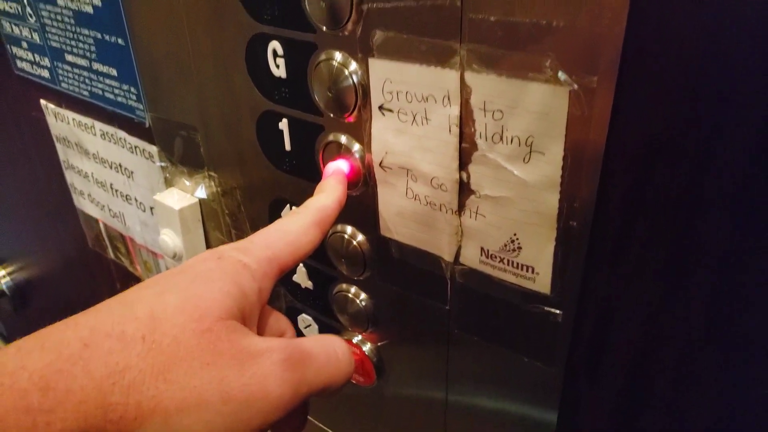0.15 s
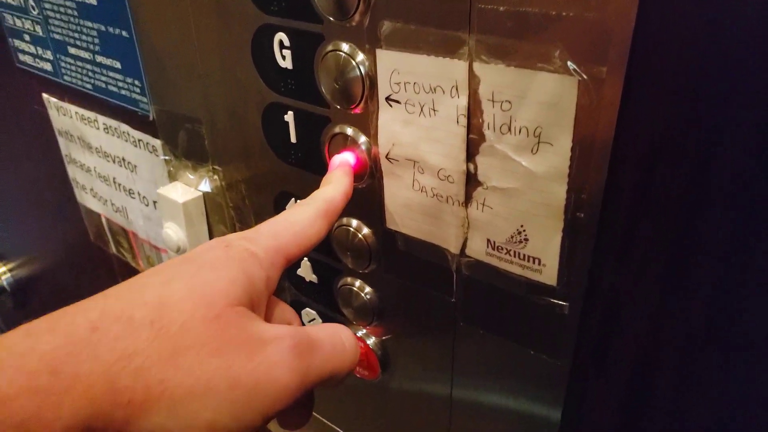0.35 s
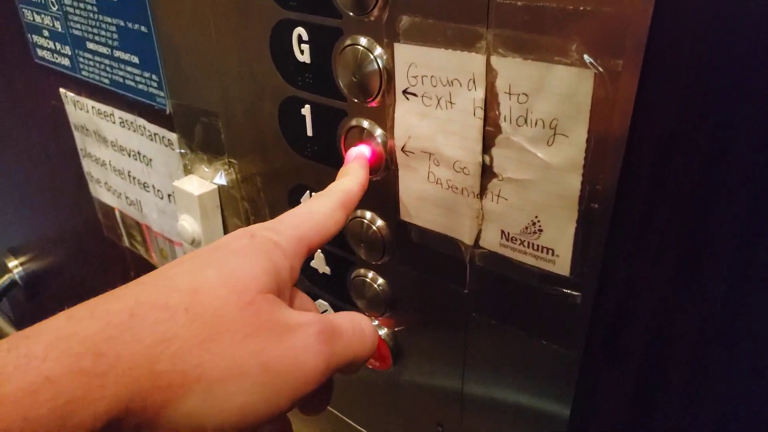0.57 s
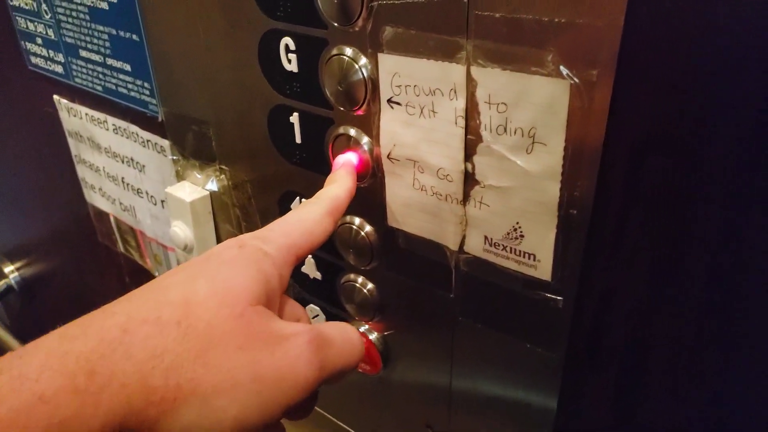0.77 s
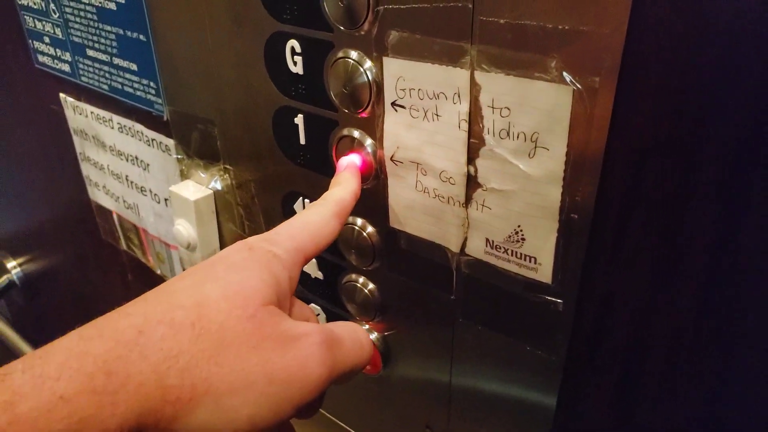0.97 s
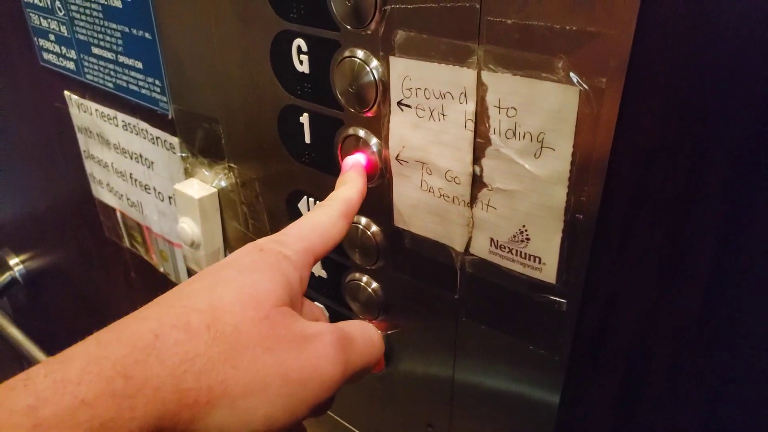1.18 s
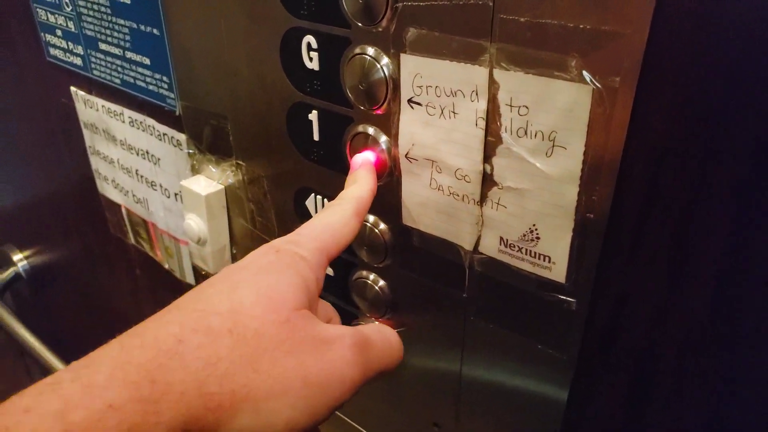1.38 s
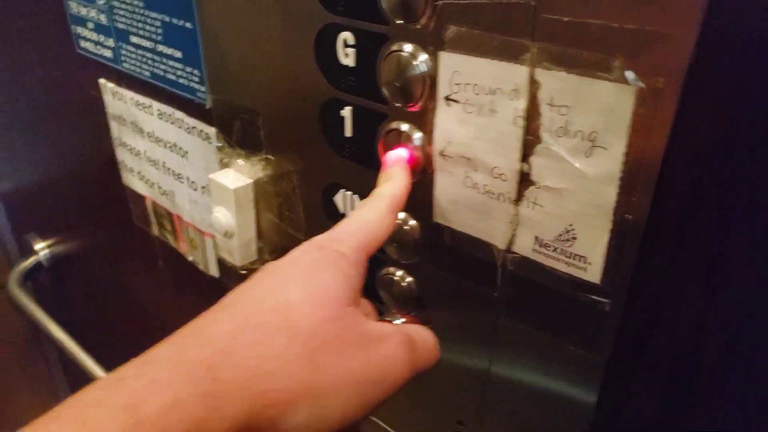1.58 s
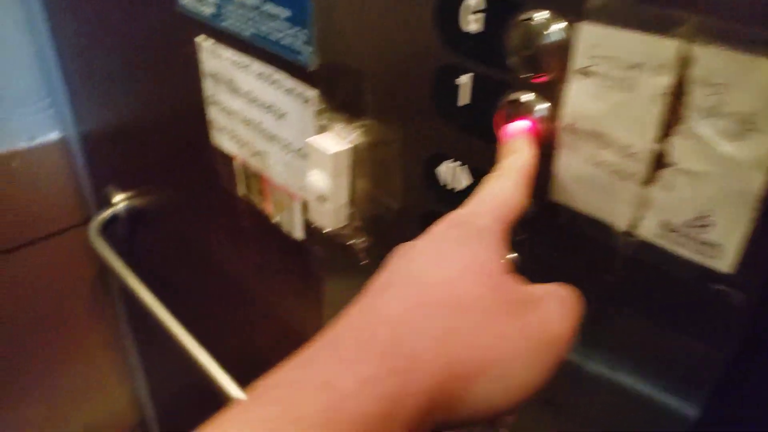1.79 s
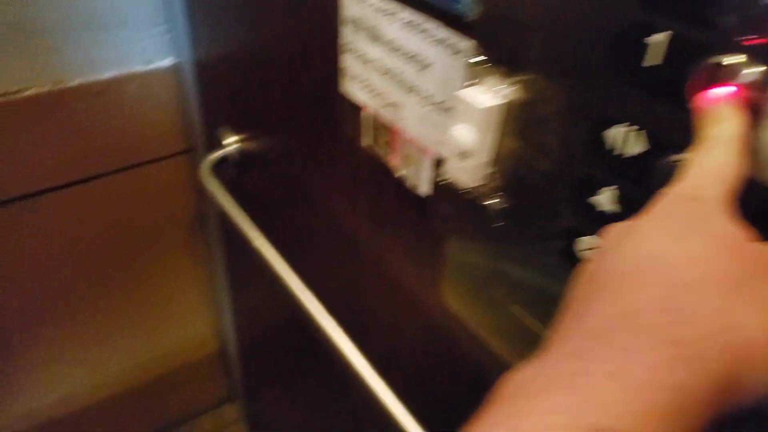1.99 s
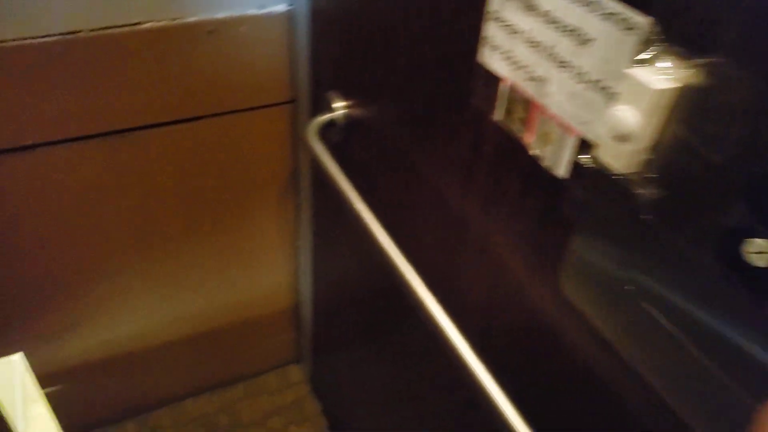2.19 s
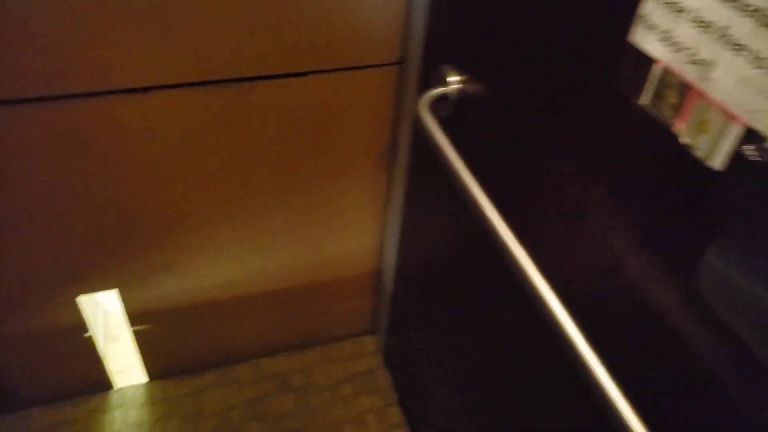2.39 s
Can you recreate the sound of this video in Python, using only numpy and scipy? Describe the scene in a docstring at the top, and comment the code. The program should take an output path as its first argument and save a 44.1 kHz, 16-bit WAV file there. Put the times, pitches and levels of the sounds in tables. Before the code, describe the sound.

An elevator mechanism clunks loudly inside a small cab. Low, surging rumble begins quietly, with motor hum and thin hiss rising and light latch ticks near 0.3 s. The rattling metallic clunk hits at 0.75 s with a deep boom, then a steel knock rings and bounces at 1.0-1.1 s. Shaft echoes fade under steady hum; ticks at 1.25 and 2.3 s, a faint ping at 2.36 s.

```python
"""A lift's mechanism clunks in its shaft, heard inside the small cab as it sets off; then a steel part
knocks and rings. Both are coloured noise with a dense echo tail, plus clusters of decaying metal modes.
Two jolts make the cab boom in damped sines. Latch ticks are resonant noise, and a faint ping ends them.
Underneath lie wavering sine tones (motor hum, drone, a brief singing tone) and shaped noise: the rumble
of the ride, soft rushing, the drive's hiss and whine, and faint microphone noise."""
import sys
import numpy as np
from scipy import signal
from scipy.fft import rfft, irfft
from scipy.io import wavfile
from scipy.ndimage import uniform_filter1d

SR = 44100
rng = np.random.default_rng(int(sys.argv[2]) if len(sys.argv) > 2 else 0)


def materialize(psi):
    """Save the field psi as 16-bit PCM at rate SR to the path in sys.argv[1].

    A 1-D psi becomes a single channel; in a 2-D psi each row is a channel.
    """
    bounded = np.clip(np.atleast_2d(psi).T, -1, 1)
    quanta = np.round(bounded * 32767).astype(np.int16)
    wavfile.write(sys.argv[1], SR, quanta)


N = 108045
T = np.arange(N) / SR
FREQS = np.maximum(np.fft.rfftfreq(N, 1 / SR), 1)  # Hz, kept above zero for the logarithms


def undb(db):
    """Decibels to gain."""
    return 10 ** (np.asarray(db) / 20)


def by_hz(table, hz=FREQS):
    """Read a table on a log-frequency axis."""
    table_hz, values = np.array(table).T
    return np.interp(np.log(hz), np.log(table_hz), values)


def by_time(table):
    """Gain from a level curve."""
    return undb(np.interp(T, *np.array(table).T))


def decay(t, t60):
    """Exponential decay that falls 60 dB in t60 seconds."""
    return np.exp(-np.log(1000) * t / t60)


def build_up(t, build_s):
    """Exponential rise towards full level with this time constant."""
    return 1 - np.exp(-t / build_s)


def walk(rate):
    """Slow random drift around 0 with a spread near 1: stepped noise, smoothed twice."""
    step = int(SR / rate)
    steps = np.repeat(rng.standard_normal(N // step + 1), step)
    smooth = uniform_filter1d(uniform_filter1d(steps, step), step)
    return 1.077 * smooth[:N]


def sides(hz):
    """Left and right microphone gains at these frequencies, with their mean power kept at 1."""
    # balance of the two microphones: f/Hz, left minus right/dB
    balance = [(60, -.1), (100, -.3), (145, -2.8), (230, 0.3), (450, 0.83), (1200, -.7), (2400, -3.5),
               (4400, -3.5), (6200, -10), (8500, -20), (11000, -14), (14500, -7)]
    gains = undb(np.array([[.5], [-.5]]) * by_hz(balance, hz))
    return gains / np.sqrt(np.mean(gains ** 2, axis=0))


def field(db):
    """Diffuse noise of a given colour, less alike at the two microphones as pitch rises, rms 1."""
    # likeness of the two microphones: f/Hz, correlation (limited to -1..1 below)
    likeness = [(30, 0.99), (60, 1), (150, 0.99), (280, 0.93), (550, 0.45), (1000, 0.055), (2500, 0.02),
                (6000, -0.06)]
    mid, side = rfft(rng.standard_normal((2, N)))
    like = np.clip(by_hz(likeness), -1, 1)
    both = mid * np.sqrt(1 + like) + np.array([[1], [-1]]) * side * np.sqrt(1 - like)
    noise = irfft(both * undb(db) * sides(FREQS), N)
    return noise / noise.std()


def echo(db, t60s, build_s):
    """Dense reflections of one blow: they build up while each octave dies at its own rate."""
    spectrum = rfft(field(db))
    centres = 125 * 2. ** np.arange(8)
    out = 0
    for hz, share in zip(centres, np.eye(len(centres))):
        # overlapping octave bands that add up to the whole spectrum
        weight = np.interp(np.log(FREQS), np.log(centres), share)
        band = irfft(spectrum * weight, N)
        out = out + band * decay(T, by_hz(t60s, hz))
    return out * build_up(T, build_s)


def ring(modes, build_s, spread_hz, count=8):
    """Metal modes, each a close cluster of sines that reaches the two microphones out of step."""
    t = T[:int(.7 * SR)]
    out = 0
    for hz, db, t60 in modes:
        near = hz + spread_hz * rng.uniform(-0.983, 1, (count, 1))
        phases = np.exp(2j * np.pi * rng.random((2, count)))
        cluster = (phases @ np.exp(2j * np.pi * near * t)).real
        envelope = decay(t, t60)
        # even out the chance strength of the cluster over its decay
        power = np.average(cluster ** 2, axis=1, weights=envelope ** 2)
        cluster = cluster / np.sqrt(power)[:, None]
        out = out + sides([hz]) * undb(db) * cluster * envelope
    total = np.sqrt(sum(undb(db) ** 2 for _, db, _ in modes))
    return out * build_up(t, build_s) / total


def strike(response, blows):
    """Sound a response once for every (t/s, level/dB) blow."""
    out = np.zeros((2, N))
    for s, db in blows:
        start = int(s * SR)
        part = response[:, :N - start]
        out[:, start:start + part.shape[1]] += undb(db) * part
    return out


def tone(hz, waver, flutter_db):
    """A machine tone: a sine whose pitch (by a fraction) and level (in dB) drift at random."""
    phase = 2 * np.pi * np.cumsum(hz * (1 + waver * walk(10))) / SR
    return np.sqrt(2) * sides([hz]) * np.sin(phase) * undb(flutter_db * walk(16.18))


def rumble():
    """The rumble of the ride: low noise that surges and sinks."""
    # rumble level: t/s, level/dB
    levels = [(0, -54), (0.08, -45), (0.12, -32.5), (0.17, -39.5), (0.21, -30), (0.3, -39), (0.4, -37),
              (0.51, -46.5), (0.59, -33), (0.72, -48), (0.8, -32), (1.1, -33.5), (1.2, -41.5), (1.45, -44),
              (1.56, -35.5), (1.8, -59), (1.92, -45.5), (2.06, -42.5), (2.22, -51.5), (2.45, -50.5)]
    # rumble spectrum: f/Hz, relative level per Hz/dB
    colour = [(18, -73), (27, -29), (33, -21), (45, -4.5), (57, -4), (72, -5.5), (92, -12.5), (130, -11),
              (200, -31.5), (400, -53)]
    cut_above = 120 * (FREQS > colour[-1][0])  # dB
    return by_time(levels) * field(by_hz(colour) - cut_above)


def rush():
    """Soft rushing: diffuse noise in the low middle."""
    # rushing level: t/s, level/dB
    levels = [(0, -70), (0.09, -64.5), (0.14, -53), (0.3, -51), (0.5, -52), (0.72, -50.5), (1.3, -53),
              (1.9, -56.5), (2.45, -55)]
    # rushing spectrum: f/Hz, relative level per Hz/dB
    colour = [(70, -29), (130, 3.5), (210, -1), (290, -7.5), (350, -11.5), (420, -12.5), (600, -28.5),
              (1000, -36.5), (2400, -36.5), (4000, -53.5)]
    return by_time(levels) * field(by_hz(colour))


def hum():
    """The motor hum: an unsteady sine and its weak octave, later at the left microphone."""
    # hum level: t/s, level/dB
    levels = [(0, -57), (0.18, -46), (0.45, -40), (0.9, -39.5), (1.4, -40.5), (1.8, -40), (2.1, -41),
              (2.45, -46.5)]
    hum_hz, waver, octave_db, left_lag_s = 143.1, 0.0031, -20.5, .0003
    octave = tone(2 * hum_hz, waver, flutter_db=0.0)
    left, right = tone(hum_hz, waver, flutter_db=-0.14) + undb(octave_db) * octave
    left = np.interp(T - left_lag_s, T, left)
    return by_time(levels) * np.array([left, right])


def drone():
    """A higher motor drone that swells slowly, a little below the hum's octave."""
    # drone level: t/s, level/dB
    levels = [(0, -80.5), (0.9, -58.5), (1.25, -52.5), (1.8, -56), (2.45, -59.5)]
    return by_time(levels) * tone(273.7, waver=0.0043, flutter_db=2.3)


def hiss():
    """The drive's thin hiss: noise with narrow resonances that comes up as the drive starts."""
    # hiss spectrum: f/Hz, relative level per Hz/dB
    colour = [(350, -78), (600, -10), (720, -21.5), (765, -15), (833, -7), (875, -1.5), (1010, 1),
              (1340, -17.5), (2230, -4.5), (3340, -24.5), (4050, -23), (4310, -14), (5430, -13),
              (6520, -13.5), (7450, -25.5), (8840, -14), (11000, -37), (14300, -57), (22000, -120)]
    # narrow resonances on top of it: f/Hz, height/dB
    resonances = [(4345, 9), (5260, 3.5), (5540, 3.5), (5970, 9), (6363, 6.5), (8597, 5.5), (8915, 4)]
    width_hz = 24
    level_db, start_s, full_s, idle_db = -67.5, 0.16, 0.33, -24.5  # idle is relative to full level
    peaks = sum(db / (1 + ((FREQS - hz) / width_hz) ** 2) for hz, db in resonances)
    swell = by_time([(start_s, idle_db), (full_s, 0)])
    return undb(level_db) * swell * field(by_hz(colour) + peaks)


def whine():
    """The drive's rough whine: a narrow band of noise."""
    # whine level: t/s, level/dB
    levels = [(0.18, -100), (0.27, -76.5), (0.6, -76), (1.4, -78), (2.45, -89)]
    centre_hz, width_hz = 5550, 70
    band_db = -20 * np.log10(1 + ((FREQS - centre_hz) / width_hz) ** 2)
    return by_time(levels) * field(band_db)


def ticks():
    """Light latch ticks: smeared bursts of noise, each with its own three resonances."""
    # ticks: t/s, level/dB, tilt/dB per octave, three resonances f/Hz
    events = [(0.316, -60.5, -.5, 3600, 4050, 5740), (0.334, -49.5, -0.99, 2000, 3440, 11600),
              (1.236, -59, 0.57, 2400, 3980, 14400), (1.297, -49.5, 0.98, 2360, 3030, 4480),
              (2.294, -56.5, 0.34, 1205, 2380, 3860), (2.320, -54.5, 2.5, 990, 1540, 2330)]
    # shared spectrum: f/Hz, relative level per Hz/dB
    base_colour = [(200, -17), (650, 1.5), (1100, -8.5), (1450, -6), (2200, -7), (2650, -5), (3600, -12),
                   (4800, -11), (7500, -14), (12000, -13), (15500, -18)]
    # echo decay: f/Hz, t60/s
    t60s = [(300, 1), (2500, .45), (13000, 0.25)]
    peak_db, width = 11.5, 0.065  # width is a fraction of each resonance's frequency
    out = 0
    for s, db, tilt, *resonances in events:
        peaks = sum(peak_db / (1 + ((FREQS / hz - 1) / width) ** 2) for hz in resonances)
        colour = by_hz(base_colour) + tilt * np.log2(FREQS) + peaks
        out = out + strike(echo(colour, t60s, build_s=.007), [(s, db)])
    return out


def impact(contacts, colour, t60s, build_s, crash_db, modes, ring_db, spread_hz):
    """Each contact gives a diffuse crash and rings the metal, dulled above its own upper edge."""
    out = 0
    for s, db, edge_hz in contacts:
        crash = undb(crash_db) * strike(echo(by_hz(colour), t60s, build_s), [(s, db)])
        metal = undb(ring_db) * strike(ring(modes, build_s, spread_hz), [(s, db)])
        lowpass = signal.butter(2, min(edge_hz, SR / 2 - 1), fs=SR, output="sos")
        out = out + signal.sosfilt(lowpass, crash + metal)
    return out


def clunk():
    """The mechanism engages in a few quick contacts; its housing rings in the shaft."""
    # contacts: t/s, relative level/dB, upper edge f/Hz
    contacts = [(0.749, -14, 3000), (0.755, -8.5, 6000), (0.763, -2.5, 15500), (0.772, -4.5, 15000)]
    # crash spectrum: f/Hz, relative level per Hz/dB
    colour = [(150, -17.5), (280, -12), (420, -18), (490, -14), (570, -23), (780, -18.5), (1100, -28),
              (1230, -18.5), (1340, -25), (1600, -16), (1800, -21), (2200, -12), (2800, -11.5),
              (3800, -18.5), (5800, -22.5), (8800, -31), (13500, -20.5), (15500, -30)]
    # shaft echo decay: f/Hz, t60/s
    t60s = [(200, 0.81), (800, 0.89), (2500, 0.34), (6000, 0.38), (14000, 0.14)]
    # modes of the housing: f/Hz, relative level/dB, t60/s
    housing = [(778, -13, 0.64), (1219, -8.5, 0.33), (1614, -16.5, 1), (2050, -5, 0.24), (2167, -3.5, 0.32),
               (2272, -7, 0.18), (2526, 0.5, 0.18), (2414, -1.5, 0.12), (2840, -5.5, 0.31),
               (2830, -2, 0.28), (3100, -14, 0.56), (3420, -6.5, .3), (4093, -8, 0.46), (4340, -11, 0.48),
               (4463, -29, 0.47), (5805, -8.5, 0.23)]
    return impact(contacts, colour, t60s, build_s=.012, crash_db=-24,
                  modes=housing, ring_db=-25, spread_hz=20.3)


def boom():
    """Jolts rock the cab, which answers in its low modes as damped sines."""
    # jolts: t/s, relative level/dB
    jolts = [(0.771, 5), (0.939, -2)]
    # modes of the cab: f/Hz, relative level/dB, t60/s
    cab = [(37.1, -1.5, 4.03), (61.14, -14, 2), (96, 6, 0.214), (219, -9.5, 0.45), (319.4, -11.5, 0.81),
           (443, -16, 0.23)]
    level_db, build_s = -31.5, 0.004
    body = 0
    for hz, db, t60 in cab:
        body = body + sides([hz]) * undb(db) * np.sin(2 * np.pi * hz * T) * decay(T, t60)
    return undb(level_db) * strike(body * build_up(T, build_s), jolts)


def knock():
    """A steel part hits its stop, rings and bounces."""
    # contacts: t/s, relative level/dB, upper edge f/Hz
    contacts = [(0.997, -7, 3560), (1.014, 4, 4500), (1.029, 1, 14200), (1.046, -6, 14000),
                (1.097, -9.5, 8000)]
    # crash spectrum: f/Hz, relative level per Hz/dB
    colour = [(150, -7.5), (350, -26.5), (420, -17.5), (500, -24), (760, -25.5), (950, -21.5),
              (1200, -23.5), (1600, -24.5), (2150, -24), (2750, -25.5), (3800, -15.5), (4300, -27.5),
              (5300, -25), (5950, -37), (7200, -37), (7800, -51), (9500, -45.5), (15500, -58)]
    # shaft echo decay: f/Hz, t60/s
    t60s = [(200, 0.48), (800, 0.71), (2500, 0.26), (6000, 0.41), (14000, 0.36)]
    # modes of the steel part: f/Hz, relative level/dB, t60/s
    steel = [(451.7, -6, 0.44), (759, 1.5, 0.55), (2762, 2.5, 0.27), (3380, 5, 0.26), (3806, 0.5, 0.45),
             (3950, -1.5, 0.61), (5340, 8.5, 0.25), (5460, 1, 0.25), (6300, -3, .25), (6730, -10, .25),
             (7220, -6.5, 0.21), (8290, -1.5, 0.17), (9770, -14, 0.25), (11900, -13, .22), (13150, -23, .2),
             (14200, -23, .17)]
    return impact(contacts, colour, t60s, build_s=.009, crash_db=-33,
                  modes=steel, ring_db=-37.5, spread_hz=25)


def singing():
    """A brief faint singing tone: an unsteady sine that swells and fades."""
    # singing level: t/s, level/dB
    levels = [(1.2, -88), (1.42, -71), (1.6, -71.5), (1.72, -92.5)]
    return by_time(levels) * tone(517, waver=0.0031, flutter_db=2.3)


def ping():
    """A faint ping after the last tick: one ringing metal mode."""
    # ping: t/s, level/dB
    blows = [(2.36, -63.5)]
    # its mode: f/Hz, relative level/dB, t60/s
    mode = [(1515, 0, 0.84)]
    return strike(ring(mode, build_s=.007, spread_hz=9.8), blows)


def scene():
    """Everything heard in the cab."""
    ride = rumble() + rush()
    drive = hum() + drone() + hiss() + whine() + singing()
    blows = ticks() + clunk() + boom() + knock() + ping()
    return ride + drive + blows


def record(dry):
    """The microphones add faint noise; the deepest bass and the top are cut."""
    # microphone noise spectrum: f/Hz, relative level per Hz/dB
    colour = [(100, 17), (2500, 6), (5000, 0), (8500, -16), (11500, 3), (15500, 3.5)]
    noise_db, bass_hz, top_hz = -76, 24, 15550
    noise = irfft(rfft(rng.standard_normal((2, N))) * undb(by_hz(colour)), N)
    noisy = dry + undb(noise_db) * noise / noise.std()
    highpass = signal.butter(4, bass_hz, "high", fs=SR, output="sos")
    lowpass = signal.ellip(10, .2, 80, top_hz, fs=SR, output="sos")
    return signal.sosfilt(lowpass, signal.sosfilt(highpass, noisy))


dry = scene()
out = record(dry)
materialize(out)
```